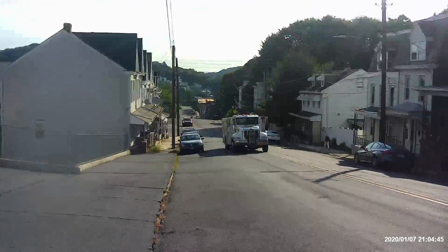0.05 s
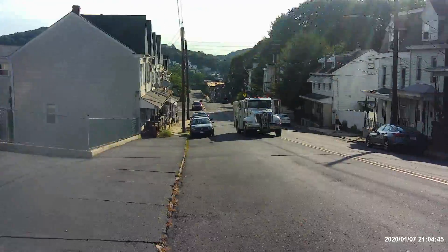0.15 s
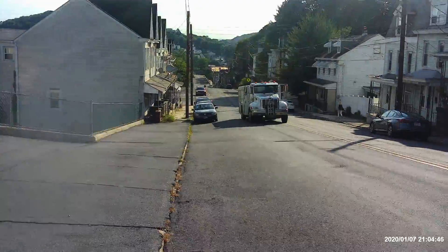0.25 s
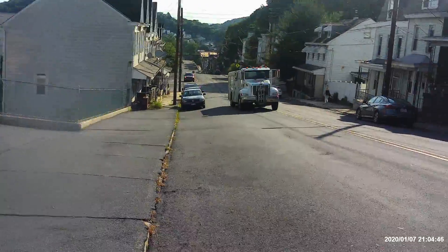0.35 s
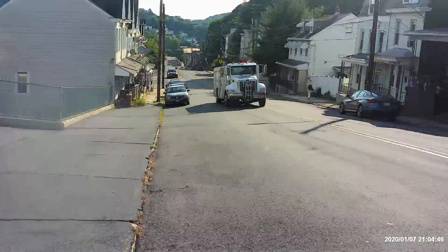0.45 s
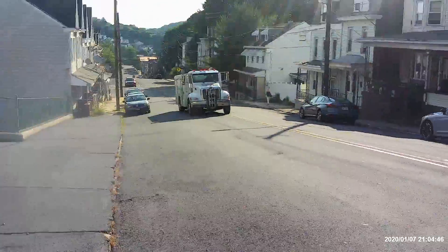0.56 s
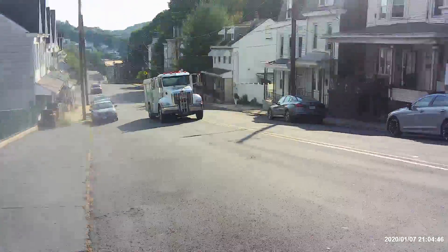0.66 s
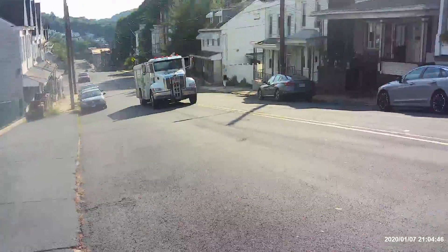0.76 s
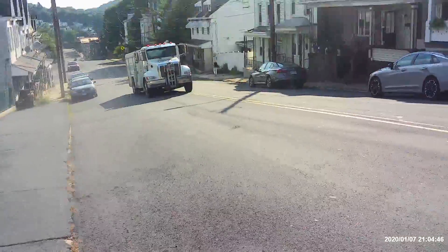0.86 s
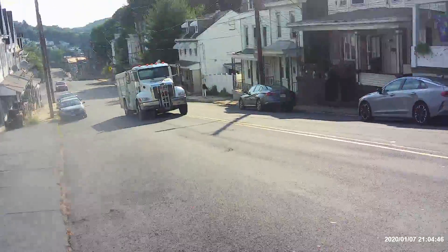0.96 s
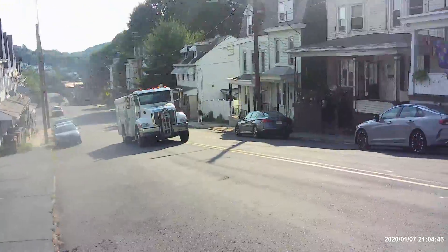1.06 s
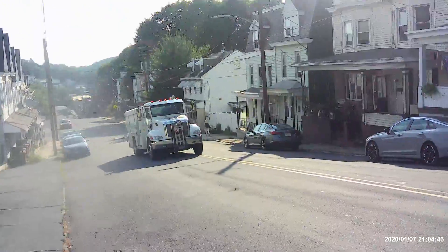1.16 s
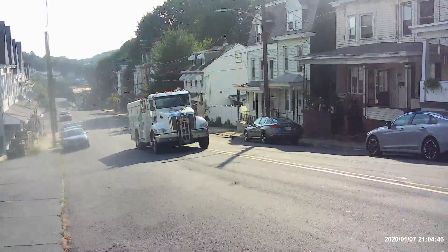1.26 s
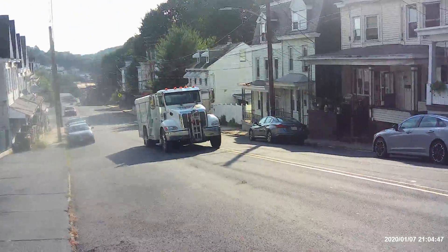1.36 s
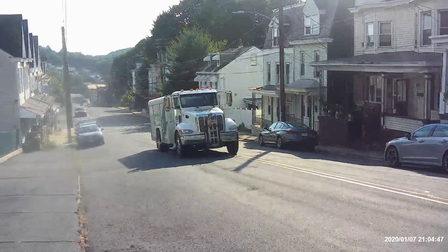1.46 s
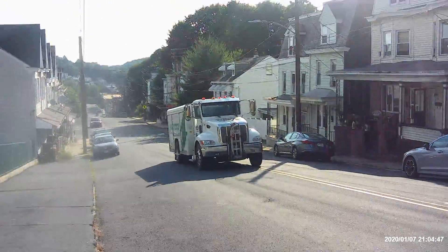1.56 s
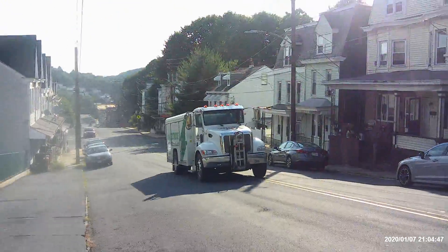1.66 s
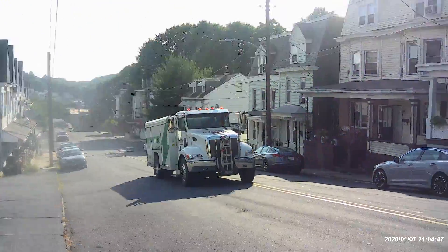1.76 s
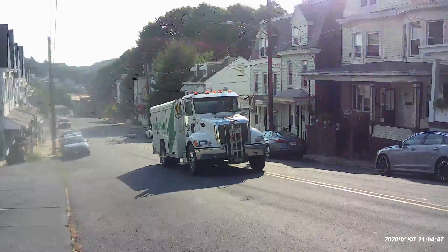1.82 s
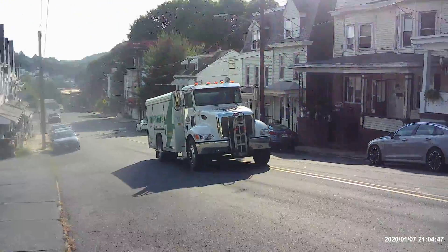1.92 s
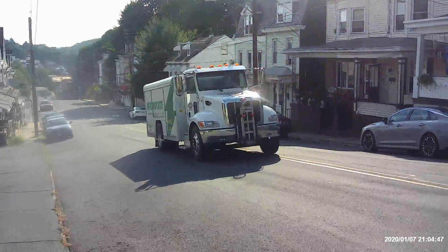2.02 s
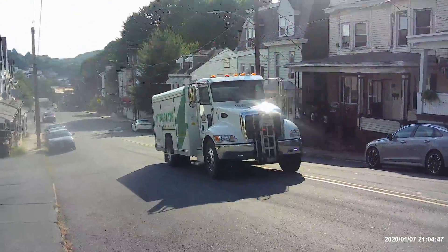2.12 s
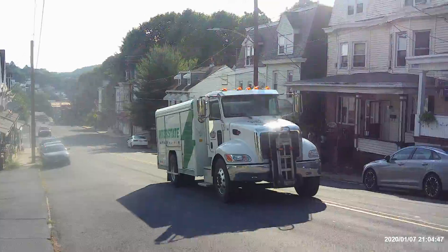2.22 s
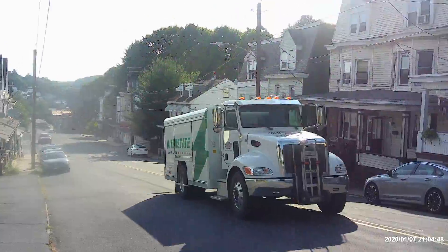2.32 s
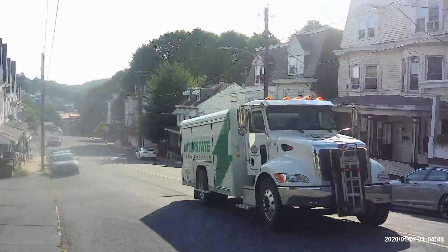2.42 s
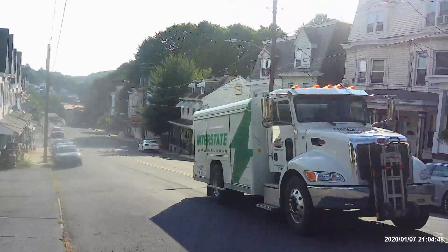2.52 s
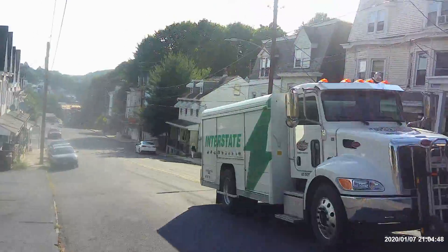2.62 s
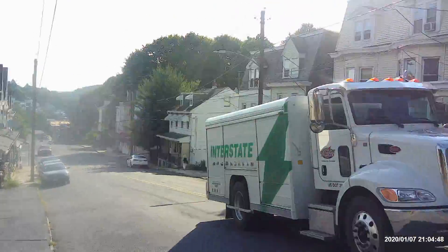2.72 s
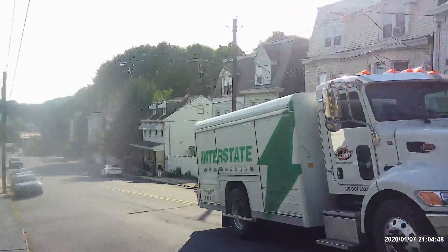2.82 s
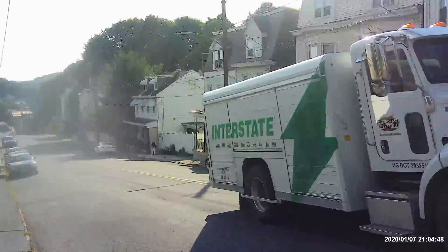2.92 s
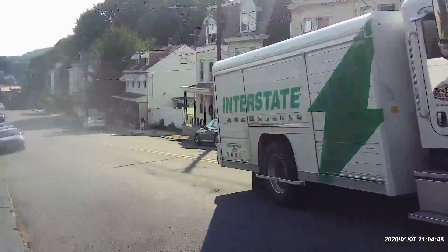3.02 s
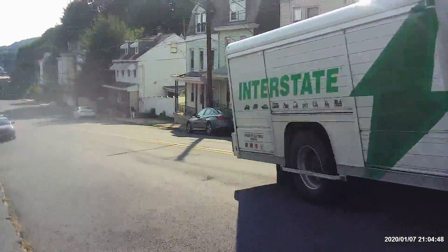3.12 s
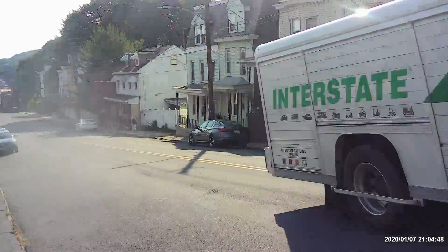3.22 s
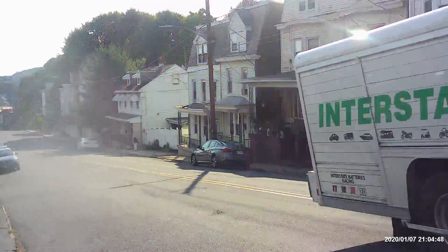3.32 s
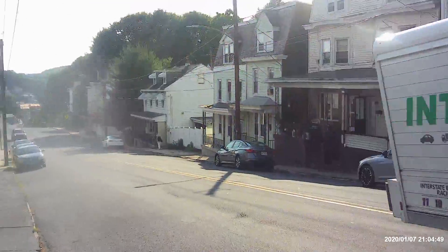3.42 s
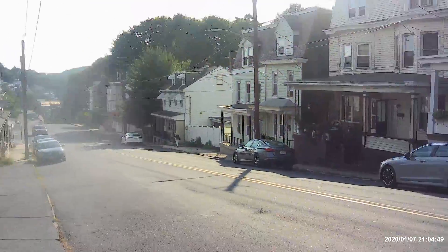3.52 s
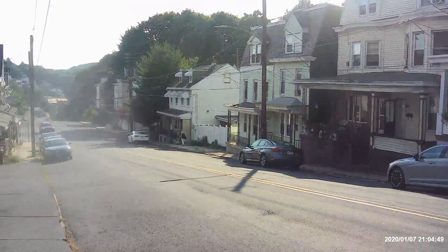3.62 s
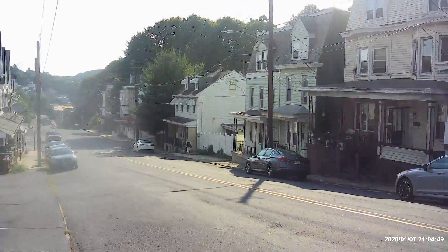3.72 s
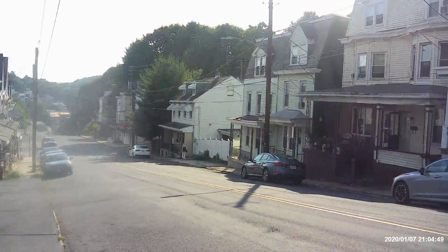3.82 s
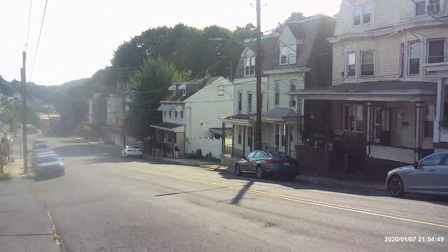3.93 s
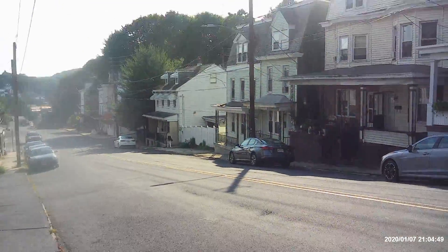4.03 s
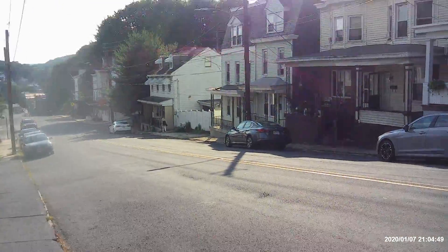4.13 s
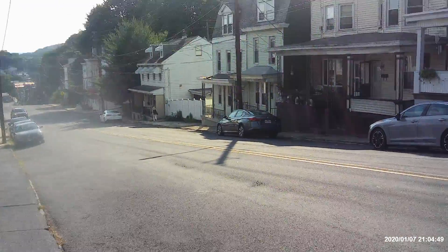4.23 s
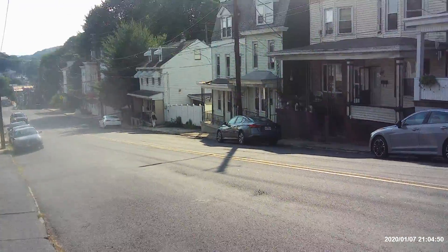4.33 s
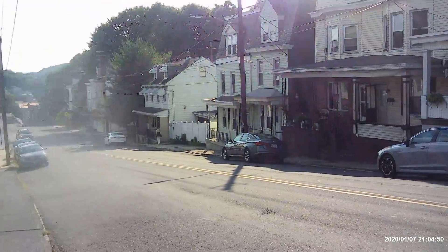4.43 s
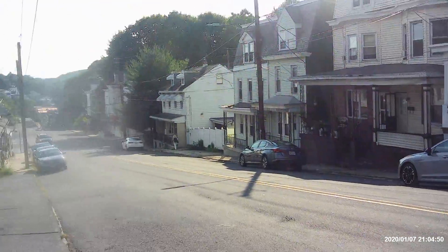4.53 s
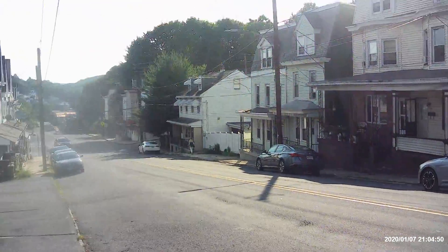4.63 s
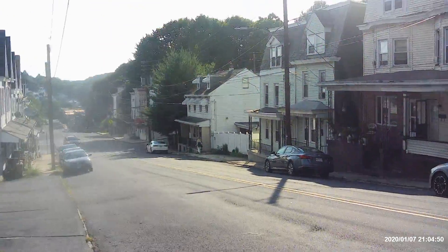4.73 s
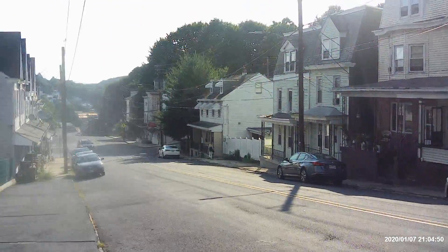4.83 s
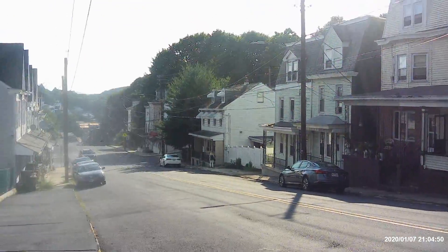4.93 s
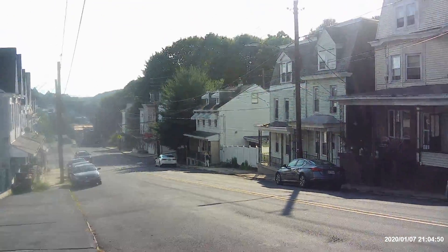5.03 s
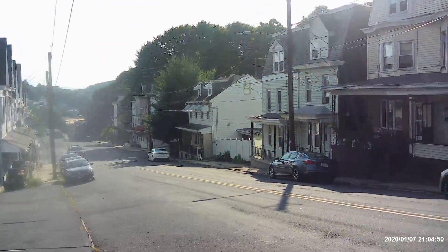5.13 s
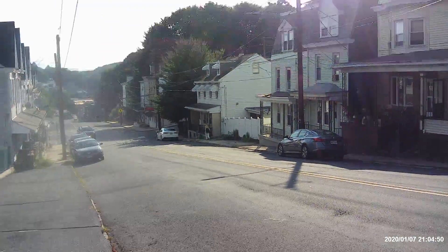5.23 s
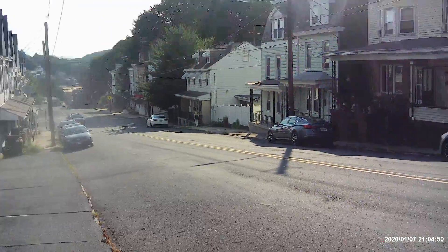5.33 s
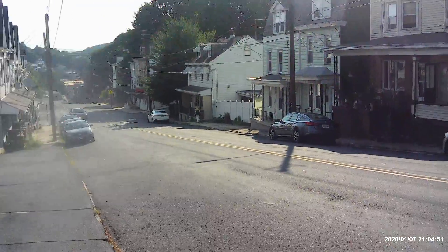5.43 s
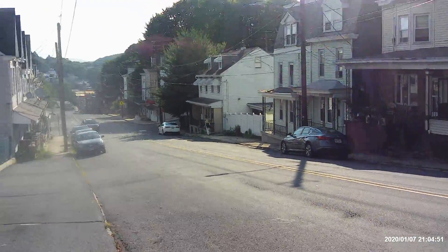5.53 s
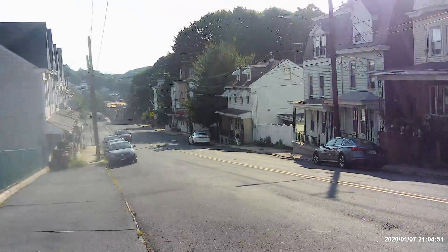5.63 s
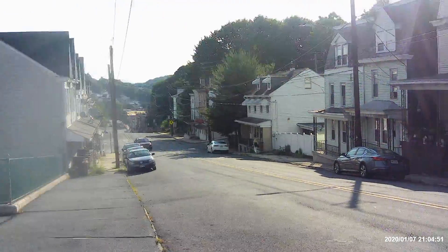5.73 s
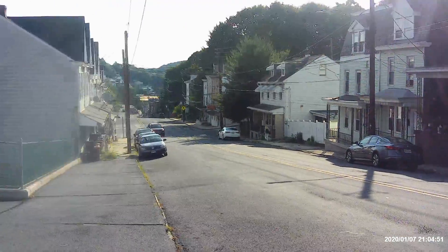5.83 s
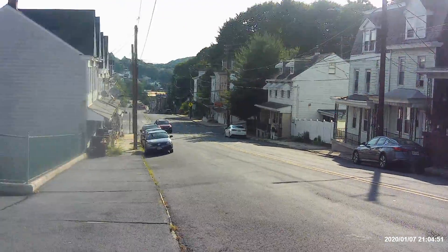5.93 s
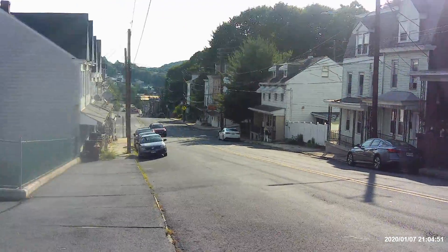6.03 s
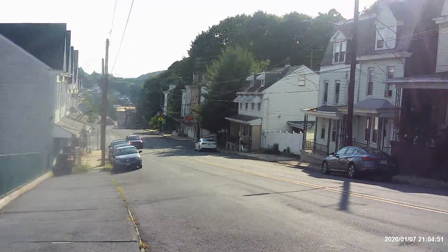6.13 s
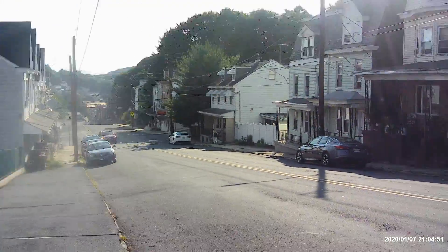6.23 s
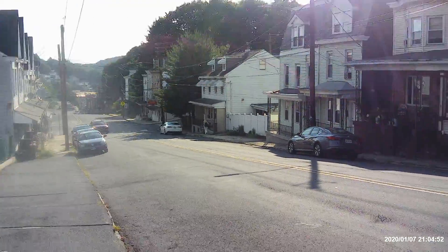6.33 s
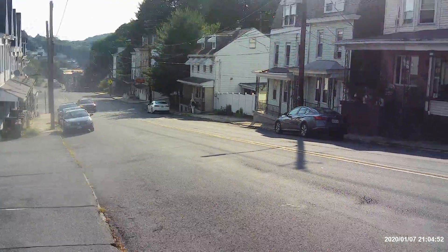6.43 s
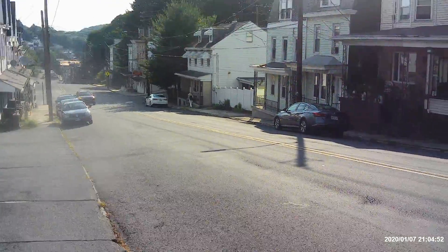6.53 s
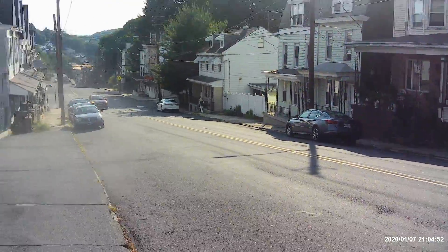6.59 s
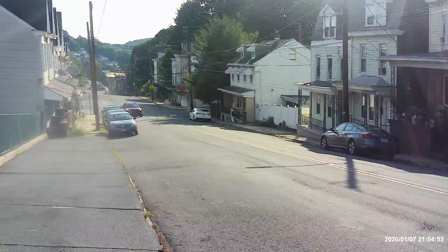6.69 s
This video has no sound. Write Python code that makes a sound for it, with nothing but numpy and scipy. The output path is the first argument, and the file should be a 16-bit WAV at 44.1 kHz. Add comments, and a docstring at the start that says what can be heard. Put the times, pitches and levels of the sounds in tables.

```python
"""A six-cylinder diesel truck climbs a street of houses, passes close at about 3.5 s and pulls away.
Periodic firing gives a hum and drone of slowly rising pitch and excites the block and its thin covers,
which clatter. Exhaust, fan and tyres roar, a few low knocks sound, and a thin turbo whine sits on top.
Levels fall with distance, and the Doppler effect lowers the engine and turbo pitch at the pass.
Reflections from the house fronts interfere with the direct sound, so single tones swell and fade."""
import sys
import numpy as np
from scipy import signal
from scipy.fft import irfft
from scipy.io import wavfile
from scipy.ndimage import map_coordinates

SR = 44100
rng = np.random.default_rng(int(sys.argv[2]) if len(sys.argv) > 2 else 0)


def log_audio(samples):
    """Write samples as a 16-bit WAV file to the path given in sys.argv[1]."""
    # one column per channel
    frames = np.atleast_2d(samples).T
    # limit to full scale, then quantise
    limited = np.clip(frames, -1, 1)
    pcm = np.round(limited * 32767).astype(np.int16)
    wavfile.write(sys.argv[1], SR, pcm)


N = 298116
TIME = np.arange(N) / SR
SPEED_M_S, SOUND_M_S = 6.9, 343


def amp(db):
    """Amplitude ratio of a level in decibels."""
    return np.exp(np.asarray(db) * np.log(10) / 20)

def unit(x):
    """Normalisation to an rms of one."""
    return x / np.sqrt(np.mean(abs(x) ** 2) + 1e-20)

def curve(rows):
    """Linear interpolation of (time, value) rows at every sample."""
    return np.interp(TIME, *np.transpose(rows))

def wander(rate):
    """Smooth random modulation of rms one, with rate new values a second."""
    knots = rng.standard_normal(4096)
    coarse = np.arange(0, N + 64, 64) / SR
    spline = map_coordinates(knots, [coarse * rate + 2], order=3, mode="wrap")
    return np.interp(TIME, coarse, unit(spline))

def turn(at, span):
    """Smooth transition from 0 to 1, as when another side of the truck comes into view."""
    return .5 + .5 * np.tanh((TIME - at) / span)

def blend(sounds, turns):
    """Successive crossfades, each given as (midpoint, span) in seconds."""
    out = sounds[0]
    for sound, (at, span) in zip(sounds[1:], turns):
        share = turn(at, span)
        out = out * (1 - share) + sound * share
    return out

def swell(at, half_width_s):
    """Gaussian envelope with a peak of one."""
    return np.exp(-((TIME - at) / half_width_s) ** 2)

def swells(rows):
    """Superposition of Gaussian envelopes, each with its own level."""
    return sum(amp(db) * swell(at, half_width_s) for at, half_width_s, db in rows)

def colour(x, spectrum):
    """Spectral shaping by (Hz, dB) points, with a steep roll-off beyond them; rms one."""
    hz, db = np.transpose(spectrum)
    log_f = np.log(np.fft.rfftfreq(8192, 1 / SR) + 1)
    outside = np.maximum(np.log(hz[0]) - log_f, 0) + np.maximum(log_f - np.log(hz[-1]), 0)
    response = amp(np.interp(log_f, np.log(hz), db) - 100 * outside)
    taps = np.fft.fftshift(irfft(response))
    return unit(signal.oaconvolve(x, taps * np.hanning(len(taps)), "same"))

def resonate(x, hz, width_hz):
    """Resonance of unit gain whose centre frequency may vary in time."""
    spin = np.exp(2j * np.pi * np.cumsum(hz * np.ones(N)) / SR)
    pole = np.exp(-np.pi * width_hz / SR)
    return 2 * (spin * signal.lfilter([1 - pole], [1, -pole], x / spin)).real

def passing(at, peak_db, closest_m, coming_db, leaving_db):
    """Spreading loss with directivity: the level drops coming_db or leaving_db per doubled distance."""
    doublings = np.log2(np.hypot(1, SPEED_M_S * (TIME - at) / closest_m))
    return peak_db - np.where(TIME < at, coming_db, leaving_db) * doublings

def doppler(at, closest_m):
    """Doppler factor: frequency is raised on approach and lowered in retreat."""
    along_m = SPEED_M_S * (TIME - at)
    return 1 / (1 + SPEED_M_S / SOUND_M_S * along_m / np.hypot(along_m, closest_m))


# The engine gathers speed uphill. Each row: time in seconds, firings per second at the source.
FIRING_RATE = [(0, 102.8), (2, 108.6), (4, 110.3), (6.76, 117.3)]

def engine_cycles():
    """Phase is the integral of frequency: a running count of cycles, six firings to each."""
    firing_hz = curve(FIRING_RATE) * doppler(at=3.52, closest_m=3.1)
    return np.cumsum(firing_hz * (1 + .003 * wander(12))) / SR / 6

def harmonic(cycle, number, scatter, fade_rate=4.5):
    """Multipath fading: a direct tone plus a randomly scattered part; rms one."""
    angle = 2 * np.pi * (number * cycle + rng.random())
    in_phase = (1 + scatter * wander(fade_rate)) * np.cos(angle)
    return unit(in_phase + scatter * wander(3 * fade_rate) * np.sin(angle))

# Envelopes of three harmonics. Each row: time in seconds, relative level in dB.
HUM_LEVEL = [(0.0, -37), (0.34, -30), (0.87, -30), (1.17, -45), (1.43, -32), (1.64, -30), (2.01, -37),
             (2.3, -29), (2.37, -37), (2.48, -31), (3.07, -38), (3.27, -28), (3.52, -36), (3.95, -29),
             (4.23, -35), (4.48, -32), (4.58, -39), (4.82, -38), (4.86, -46), (5.12, -37), (5.5, -41),
             (5.59, -55), (5.76, -44), (6.42, -49), (6.55, -58), (6.76, -56)]  # dips where the echo off the houses cancels it
TAILPIPE_LEVEL = [(0.0, -53), (1.69, -44), (2.13, -38), (2.28, -45), (3.09, -41), (3.2, -32), (3.8, -30),
                  (4.25, -42), (5.23, -40), (5.35, -48), (5.85, -41), (6.31, -50), (6.36, -41), (6.76, -52)]  # screened by the truck at first
DRONE_LEVEL = [(0.0, -35), (0.53, -34), (0.61, -48), (0.64, -36), (0.76, -29), (1.11, -32), (1.14, -43),
               (1.16, -33), (1.36, -25), (1.57, -42), (1.85, -31), (2.07, -35), (2.62, -33), (2.8, -26),
               (3.05, -22.5), (3.31, -23), (3.4, -27)]  # radiated forward
# Briefly swelling tones. Each row: harmonic number, centre and half-width in seconds, level in dB.
HARMONIC_SWELLS = [(39, .9, .45, -44), (42, .9, .35, -42), (14, 2.5, .4, -35), (22, 2.6, .22, -32.5),
                   (12, 2.45, .25, -35), (12, 3.5, .12, -29), (26, 3.6, .09, -30), (12, 3.85, .13, -31),
                   (26, 3.85, .11, -30), (15, 6.7, .2, -48)]
# Other engine tones. Each row: harmonic number, relative levels in dB from ahead and from behind.
HARMONICS = [(3, -39.5, -35), (4, -31, -39), (7, -30.5, -26), (8, -23, -35), (10, -22, -32),
             (11, -9.5, -18), (12, -9, -15.5), (13, -14, -16.5), (14, -14, -18), (15, -27, -15),
             (16, -14, -30), (17, -25, -28), (20, -16, -19), (22, -12.5, -20), (24, -12, -22)]

def engine_tones(cycle, roar_db, linger_db_per_s=1.5):
    """Periodic firing radiates harmonics of the engine cycle, which fade in and out as echoes shift."""
    ahead, behind = 1 - turn(at=3.45, span=.1), turn(at=3.24, span=.58)
    hum = amp(curve(HUM_LEVEL) - .2) * harmonic(cycle, 6, scatter=.04 + .1 * turn(at=2, span=.3))
    tailpipe = amp(curve(TAILPIPE_LEVEL) - 1) * harmonic(cycle, 9, scatter=.35)
    drone = amp(curve(DRONE_LEVEL) - .3) * harmonic(cycle, 15, scatter=.1 + .15 * turn(at=1.8, span=.2))
    brief = sum(amp(db) * swell(at, half_width_s) * harmonic(cycle, number, scatter=.3)
                for number, at, half_width_s, db in HARMONIC_SWELLS)
    others = sum(amp(front_db + (rear_db - front_db) * behind) * harmonic(cycle, number, scatter=.75)
                 for number, front_db, rear_db in HARMONICS)
    others_db = roar_db - 1.5 + linger_db_per_s * np.maximum(TIME - 4.3, 0)  # they outlast the roar
    return hum + tailpipe + ahead * drone + brief + amp(others_db) * others

# Waves in the growl. Each row: centre and half-width in seconds, change of level in dB.
GROWL_WAVES = [(.5, .2, 3.5), (1.2, .2, 2), (2.88, .12, -8)]

def growl(cycle, smear_hz=4.5, rough=.42):
    """Random amplitude and frequency modulation broaden harmonic 26 into a growl near 470 Hz."""
    angle = 2 * np.pi * (26 * cycle + np.cumsum(smear_hz * wander(20)) / SR)
    tone = (1 + rough * wander(45)) * np.cos(angle) + rough * wander(45) * np.sin(angle)
    level_db = passing(at=2.56, peak_db=-31.7, closest_m=2, coming_db=3, leaving_db=10)
    level_db += sum(db * swell(at, half_width_s) for at, half_width_s, db in GROWL_WAVES)
    return amp(level_db) * unit(tone)

def house_echo(x, gain=.44, far_s=.021, near_s=.045):
    """Comb filtering by a reflection off the houses, whose detour is longest as the truck passes."""
    delay_s = far_s + (near_s - far_s) / np.hypot(1, (TIME - 3.5) / 2)
    return unit(x + gain * x[((TIME - delay_s) * SR).astype(int) % N])

# Each entry: relative strength of one cylinder's knock, in firing order.
CYLINDER_STRENGTHS = [1, .42, .3, .75, .33, .3]

def combustion(cycle, depth, uneven=.1, shielded_share=.18):
    """Each firing modulates noise with a decaying pulse; one knock per crank turn stands out."""
    firings = 6 * cycle
    index = firings.astype(int)
    strength = np.array(CYLINDER_STRENGTHS)[index % 6] * np.exp(uneven * rng.standard_normal(2048)[index])
    strikes = unit(strength * np.exp(-(firings % 1)))
    exposed = 1 - shielded_share * turn(at=3.5, span=.3)  # the cargo body screens the knock from behind
    envelope = np.sqrt(1 + (depth * exposed * strikes) ** 2)
    return house_echo(rng.standard_normal(N) * envelope)

# Roar spectra from four directions. Each row: frequency in Hz, relative spectral level in dB.
FAR_ROAR = [(30, -41), (60, -28), (90, -11), (150, -1), (210, -10), (280, 0.5), (340, 2), (460, 1.5),
            (600, -3.5), (740, 3), (900, 2), (1080, -8.5), (1400, -29)]
NEAR_ROAR = [(30, -28), (60, -31), (90, -9.5), (150, -5), (210, -5), (260, 3), (340, 0), (470, 2),
             (620, -1.5), (740, -1.5), (900, -0.5), (1080, -9), (1400, -31.5)]
SIDE_ROAR = [(30, -43), (60, -27), (90, -26), (150, -6.5), (260, -2.5), (350, -1), (470, 2), (570, 1.5),
             (720, 2.5), (880, -4), (1050, -19), (1400, -34)]
REAR_ROAR = [(30, -38), (60, -24), (90, -9), (150, -5), (270, -1.8), (350, -3), (470, -2), (600, 1.5),
             (700, 2.8), (790, 1.5), (910, -5.5), (1020, -17.5), (1300, -35)]

def roar(cycle, level_db):
    """Broadband noise of exhaust puffs, fan and tyres; directivity alters its spectrum in passing."""
    source = combustion(cycle, depth=.42)
    sides = [colour(source, side) for side in (FAR_ROAR, NEAR_ROAR, SIDE_ROAR, REAR_ROAR)]
    return amp(level_db) * blend(sides, turns=[(1.5, .27), (3.4, .12), (4.164, .18)])

def sinking_resonance(x, start_hz=880, end_hz=752):
    """A spectral peak with a notch just below it gives the distant roar a nasal colour that falls."""
    hz = start_hz + (end_hz - start_hz) * turn(at=.4, span=.25)
    peak = .32 * resonate(x, hz, width_hz=90) * (1 - turn(at=1.35, span=.25))
    hollow = .33 * resonate(x, hz * .84, width_hz=100) * (1 - turn(at=1.4, span=.25))
    return x + peak - hollow

# Block spectra from five directions. Each row: frequency in Hz, relative spectral level in dB.
FRONT_BLOCK = [(800, -27), (1100, -7.5), (1350, -1), (1700, 0.5), (1850, -4), (2000, -8.5), (2250, -8),
               (2600, -22)]
NEAR_BLOCK = [(800, -27), (1100, -7), (1400, -2.5), (1680, 2), (1850, -3.5), (2000, -10), (2250, -8),
              (2600, -22)]
CLOSE_BLOCK = [(800, -27), (1100, -9), (1480, 2.5), (1720, 0), (1950, -7), (2250, -7), (2600, -22)]
SIDE_BLOCK = [(800, -33), (1100, -5), (1400, -7.5), (1800, 2), (2100, -7), (2300, -7.5), (2600, -20)]
REAR_BLOCK = [(900, -38), (1080, -16), (1180, -7), (1350, 0.5), (1600, 0.5), (1850, -2), (2120, -14),
              (2280, -11), (2600, -28)]

def block_clatter(cycle, flutter_db=.5):
    """Forced vibration of the block under diesel knock; the strongest resonance depends on the angle."""
    source = combustion(cycle, depth=.5)
    spectra = (FRONT_BLOCK, NEAR_BLOCK, CLOSE_BLOCK, SIDE_BLOCK, REAR_BLOCK)
    sides = [colour(source, side) for side in spectra]
    clatter = blend(sides, turns=[(1.3, .4), (2.55, .15), (3.33, .14), (3.97, .15)])
    level_db = passing(at=3.2, peak_db=-24.8, closest_m=4.3, coming_db=6.4, leaving_db=8.2)
    level_db += swell(at=3.16, half_width_s=.16)  # through the wheel arch
    level_db += 2.6 * swell(at=4.75, half_width_s=.7)  # from the underside, heard from behind
    return amp(level_db + flutter_db * wander(27)) * clatter

# Cover spectra from four directions. Each row: frequency in Hz, relative spectral level in dB.
FRONT_COVER = [(2000, -22.5), (2300, -5), (2600, 1), (2820, -4.5), (3020, -11), (3400, -37)]
NEAR_COVER = [(2000, -27), (2300, -6), (2620, 3), (2850, -1.5), (3100, -7), (3500, -14)]
SIDE_COVER = [(2000, -28), (2300, -6), (2480, -1), (2600, 4), (2720, -6), (2850, -9), (3050, -22),
              (3400, -25)]
REAR_COVER = [(2000, -26), (2330, -6.5), (2480, 0), (2560, 1.5), (2740, -4), (3000, -8), (3400, -26)]

def cover_rasp(cycle, flutter_db=.6):
    """Plate resonance of the thin engine covers near 2.6 kHz, narrowest as the wheel arch goes by."""
    source = combustion(cycle, depth=.55)
    sides = [colour(source, side) for side in (FRONT_COVER, NEAR_COVER, SIDE_COVER, REAR_COVER)]
    rasp = blend(sides, turns=[(2.3, .35), (3.41, .056), (3.54, .066)])
    level_db = passing(at=3.22, peak_db=-27.6, closest_m=2.4, coming_db=5.4, leaving_db=7.4)
    level_db += 2.8 * swell(at=1.25, half_width_s=.45)
    return amp(level_db + flutter_db * wander(8)) * rasp

# Hiss spectra ahead and behind. Each row: frequency in Hz, relative spectral level in dB.
FRONT_HISS = [(2600, -32), (3200, 2), (3600, 1.5), (4100, -1.5), (4450, -6), (5100, -8), (5800, -17),
              (6600, -10), (7300, -21.5), (8000, -13), (8700, -28), (9900, -47), (10400, -65)]
REAR_HISS = [(2700, -28.5), (3200, 3), (3600, 0), (4080, -1.5), (4340, -13.5), (4600, -10.5), (5050, -13.5),
             (5900, -11), (6700, -15), (7350, -21), (7900, -17.5), (8600, -33), (9900, -25.5), (10500, -63)]

def hiss(cycle, sheen_hz=3500, sheen_rise_hz=550):
    """Directional radiation: injector ticks with a rising sheen ahead, tread and air hiss behind."""
    source = combustion(cycle, depth=.43)
    front = colour(source, FRONT_HISS)
    sheen = resonate(front, sheen_hz + sheen_rise_hz * turn(at=1.85, span=.2), width_hz=300)
    front += .55 * swell(at=1.9, half_width_s=.6) * sheen
    level_db = passing(at=3.45, peak_db=-34.2, closest_m=4, coming_db=6, leaving_db=8.4)
    return amp(level_db) * blend([front, colour(source, REAR_HISS)], turns=[(3.25, .37)])

# One cover rings out. Each row: centre and half-width in seconds, level in dB.
COVER_SWELLS = [(0.68, .18, -40), (1.16, .14, -38), (3.48, .085, -30)]

def cover_ring(cycle, hz=2580, width_hz=260):
    """Forced resonance: the firings drive one narrow, metallic mode of a cover."""
    source = combustion(cycle, depth=.8)
    ring = resonate(resonate(source, hz, width_hz), hz, width_hz)
    return swells(COVER_SWELLS) * unit(ring)

# Low knocks: three in time with the engine, then thumps as the truck passes and leaves.
# Each row: start in seconds, relative level in dB.
LOW_KNOCKS = [(1.249, -11.5), (1.304, -10), (1.360, -14), (3.675, -13), (3.703, -12), (4.200, -20),
              (4.243, -21), (6.250, -31), (6.400, -37)]
# Their modes. Each row: frequency in Hz, relative level in dB, time to decay 60 dB in seconds.
KNOCK_MODES = [(266.5, -0.5, 0.075), (468, -6, .06), (587, -8, 0.044), (770, -7, 0.032), (1650, -20, .025)]

def knocks(level_db=-5, onset_s=.002, detune=.04):
    """Impulse excitation: each knock sets off damped modes, which take a moment to swing up."""
    out, t = np.zeros(N), np.arange(SR // 5) / SR
    attack = 1 - np.exp(-t / onset_s)
    for start_s, db in LOW_KNOCKS:
        tunings = 1 + detune * rng.standard_normal(len(KNOCK_MODES))
        ring = sum(amp(mode_db - 60 * t / t60) * np.sin(2 * np.pi * hz * tuning * t)
                   for (hz, mode_db, t60), tuning in zip(KNOCK_MODES, tunings))
        part = out[round(start_s * SR):][:len(t)]
        part += amp(db + level_db) * (ring * attack)[:len(part)]
    return signal.sosfilt(signal.butter(4, 170, "high", fs=SR, output="sos"), out)

def turbo(top_hz=11490, climb_hz=800, spool_s=1.1, blur_hz=400, waver_db=1.5):
    """The blade-passing tone, a faint and fuzzy whine, rises as the turbo spools up."""
    hz = (top_hz - climb_hz * np.exp(-TIME / spool_s)) * doppler(at=3.32, closest_m=.9)
    angle = 2 * np.pi * np.cumsum(hz) / SR
    whine = wander(blur_hz) * np.cos(angle) + wander(blur_hz) * np.sin(angle)
    level_db = passing(at=3.42, peak_db=-58, closest_m=3, coming_db=6, leaving_db=7)
    level_db -= 19 * (1 - turn(at=3.3, span=.03))  # heard mainly as the truck passes
    audible = turn(at=1.6, span=.15) * (1 - turn(at=4.92, span=.08))
    return amp(level_db + waver_db * wander(13)) * audible * unit(whine)

# Whistles as the cab goes by. Each row: centre and half-width in seconds, level in dB.
INTAKE_SWELLS = [(3.45, .13, -51), (3.81, .08, -51)]

def intake(hz=6800, width_hz=900):
    """Flow noise filtered twice by a resonance becomes a breathy whistle."""
    air = resonate(resonate(rng.standard_normal(N), hz, width_hz), hz, width_hz)
    return swells(INTAKE_SWELLS) * unit(air)

# Surges of the rear tyres. Each row: centre and half-width in seconds, level in dB.
TREAD_SURGES = [(3.47, .1, -25), (3.689, 0.038, -20.8), (3.84, .09, -26), (4.21, 0.055, -25.5)]
# Tread noise and its bright rush. Each row: frequency in Hz, relative spectral level in dB.
TREAD_SPECTRUM = [(120, -18), (250, -2), (480, 4), (780, 5), (1050, -17), (1800, -12), (2200, -18),
                  (3600, -14.5), (4500, -34), (7000, -34), (9500, -57)]
RUSH_SPECTRUM = [(1700, -12), (2300, -3), (3000, -1), (3700, 0), (4150, -5), (4600, -20), (7000, -24)]

def tyres(rush_db=-31.5):
    """Rolling noise: rough asphalt excites the rear tread, brightest as it passes closest."""
    tread = swells(TREAD_SURGES) * colour(rng.standard_normal(N), TREAD_SPECTRUM)
    rush = swell(at=3.69, half_width_s=.075) * colour(rng.standard_normal(N), RUSH_SPECTRUM)
    return tread + amp(rush_db) * rush

def street_air(level_db=-76):
    """A faint, steady background hiss, masked until the truck draws away."""
    spectrum = [(4500, 3), (7000, -8), (8500, 0), (10300, -7), (10800, -29.5)]
    return amp(level_db) * colour(rng.standard_normal(N), spectrum)

def scene():
    """Superposition of all sources in mono; one crankshaft times the engine's layers."""
    cycle = engine_cycles()
    roar_db = passing(at=3.63, peak_db=-17.5, closest_m=3.05, coming_db=4.85, leaving_db=8.1)
    roar_db += 1.1 * swell(at=2.2, half_width_s=.6)  # the grille faces the listener
    low = engine_tones(cycle, roar_db) + growl(cycle) + sinking_resonance(roar(cycle, roar_db))
    bursts = tyres() + knocks()
    metal = block_clatter(cycle) + cover_rasp(cycle) + cover_ring(cycle)
    treble = hiss(cycle) + intake() + turbo() + street_air()
    return (low + bursts + metal + treble)[None]

def record(dry, cutoff_hz=11950):
    """Band limiting by a steep low-pass filter."""
    taps = signal.firwin(511, cutoff_hz, window=("kaiser", 9), fs=SR)
    return signal.oaconvolve(dry, taps[None], "same")


dry = scene()
out = record(dry)
log_audio(out)
```